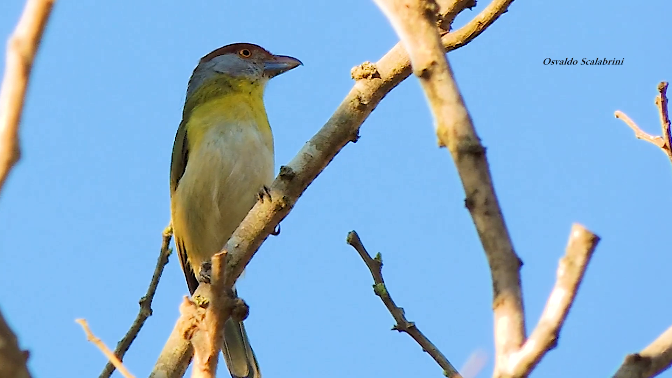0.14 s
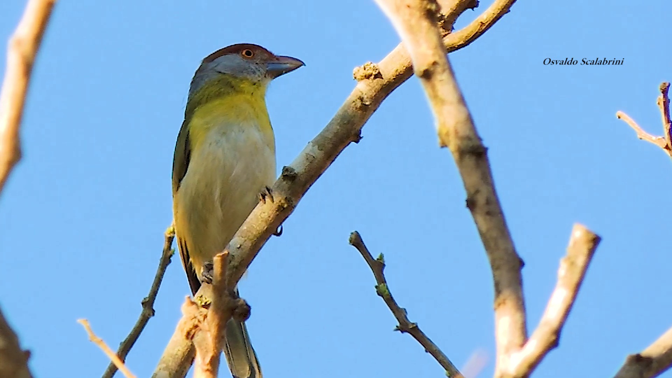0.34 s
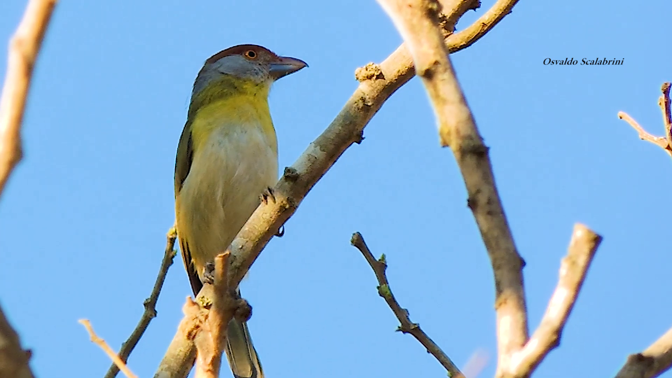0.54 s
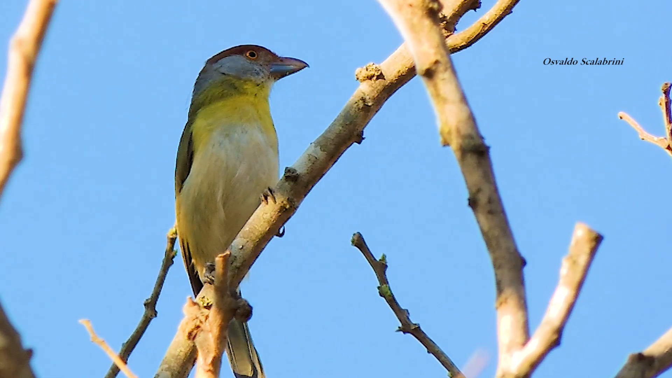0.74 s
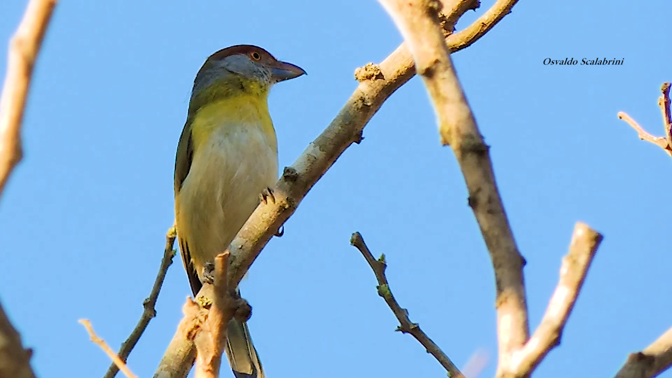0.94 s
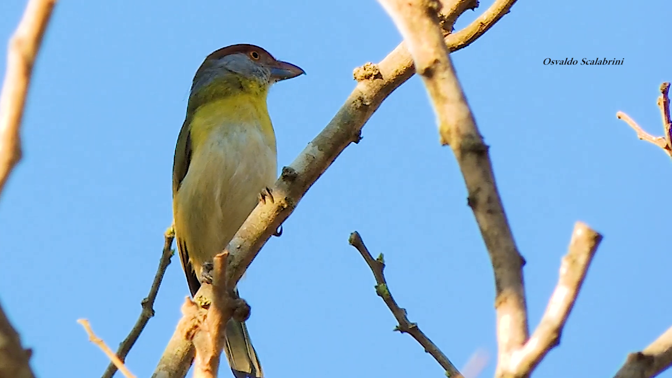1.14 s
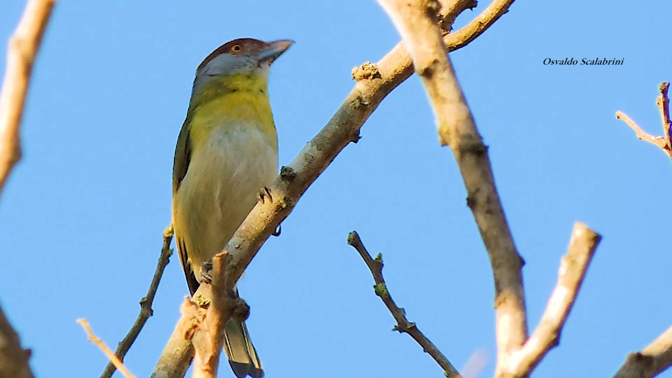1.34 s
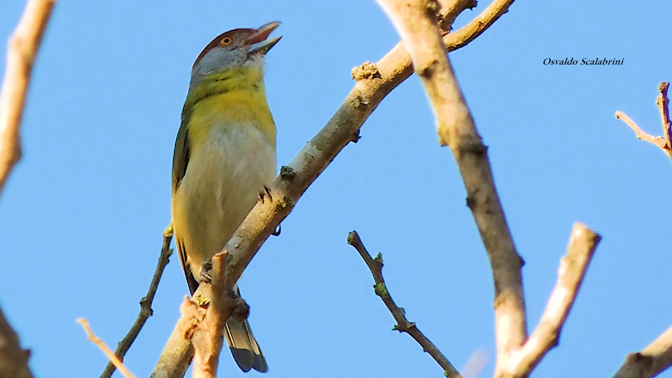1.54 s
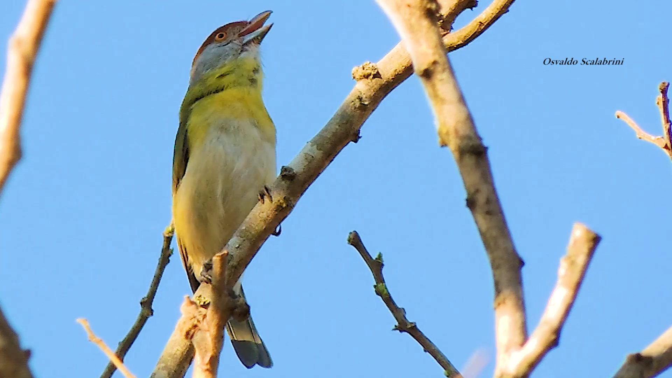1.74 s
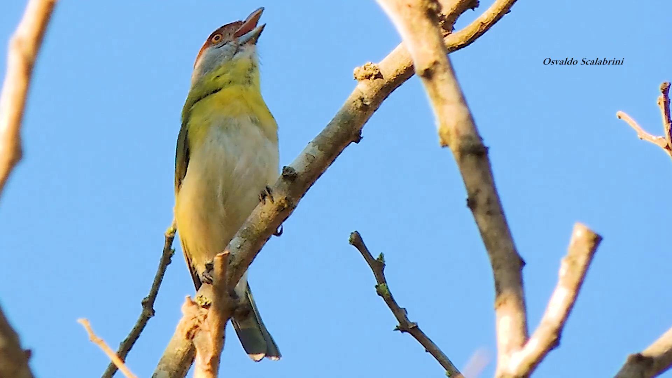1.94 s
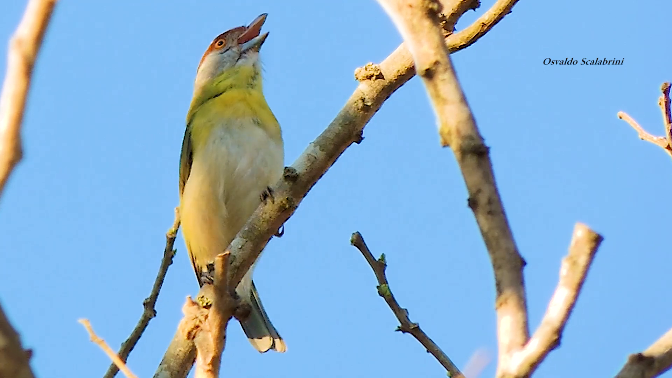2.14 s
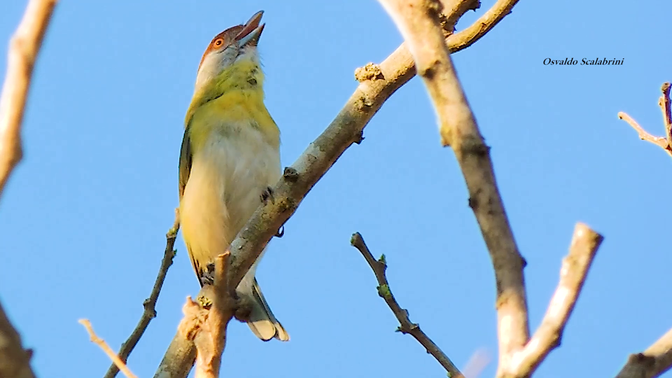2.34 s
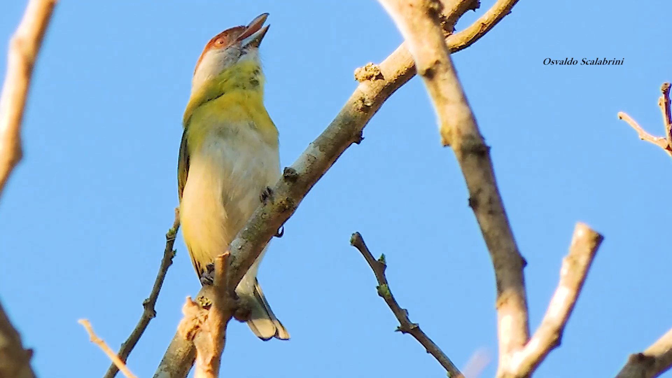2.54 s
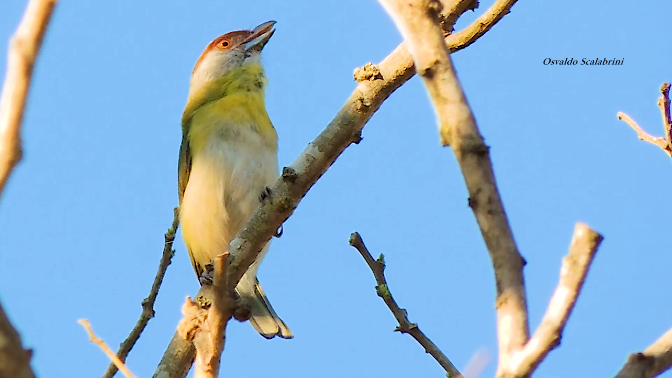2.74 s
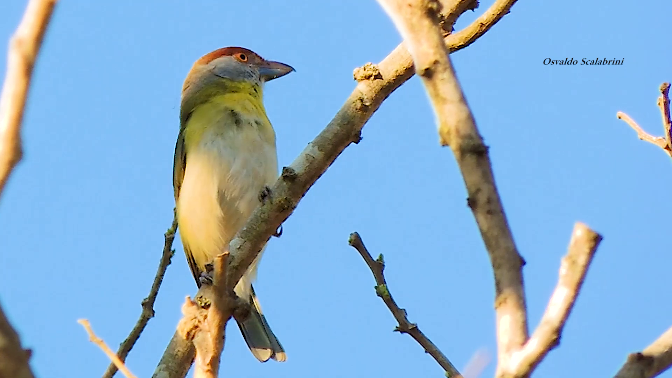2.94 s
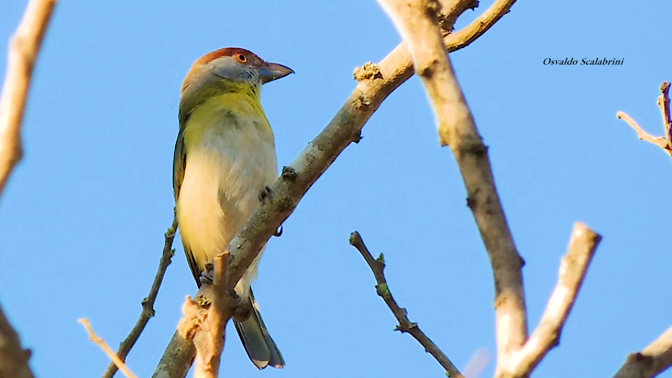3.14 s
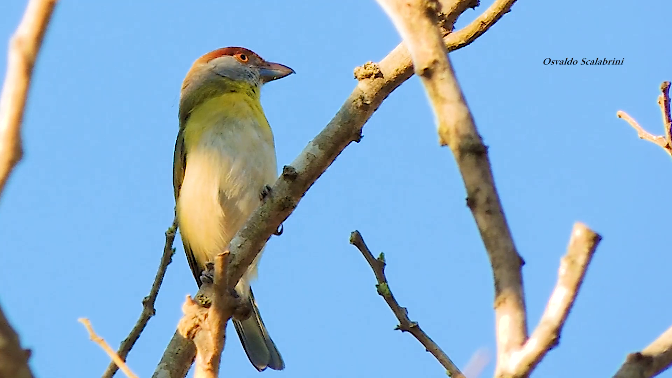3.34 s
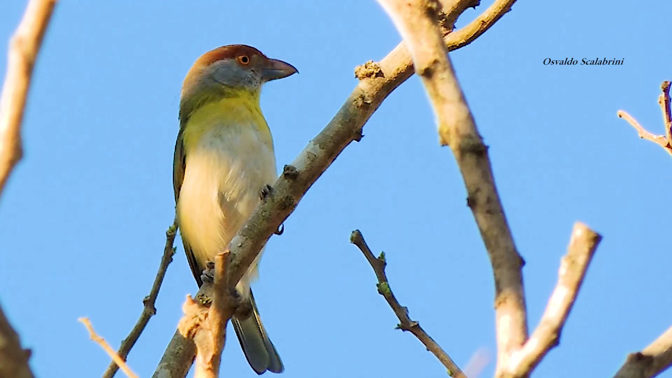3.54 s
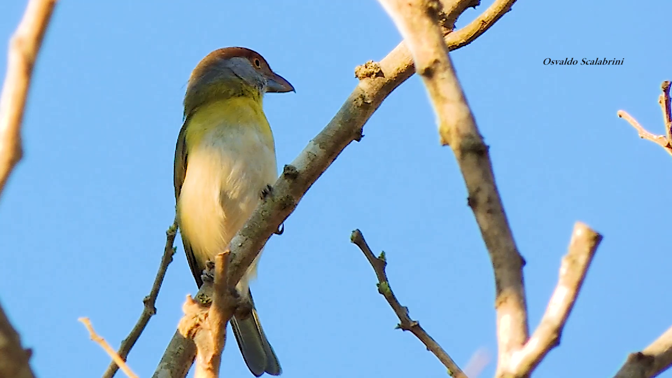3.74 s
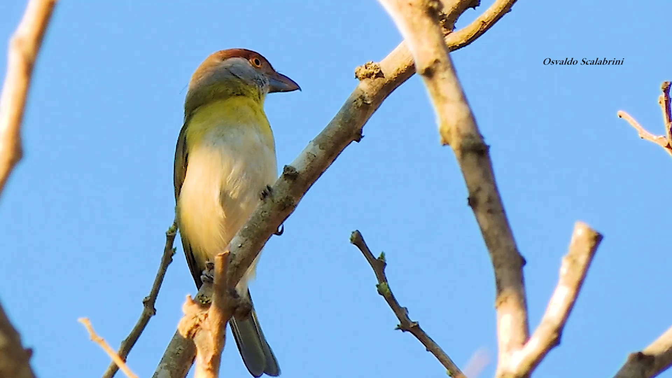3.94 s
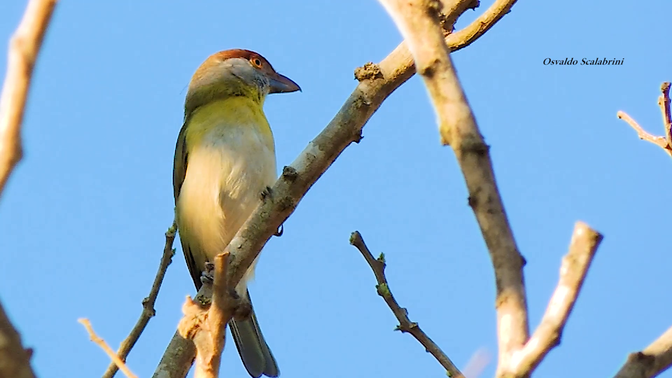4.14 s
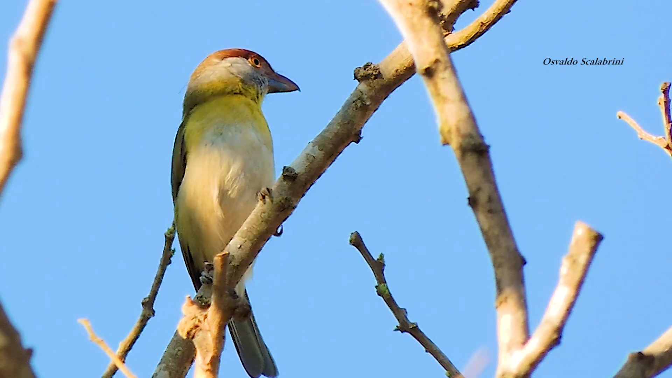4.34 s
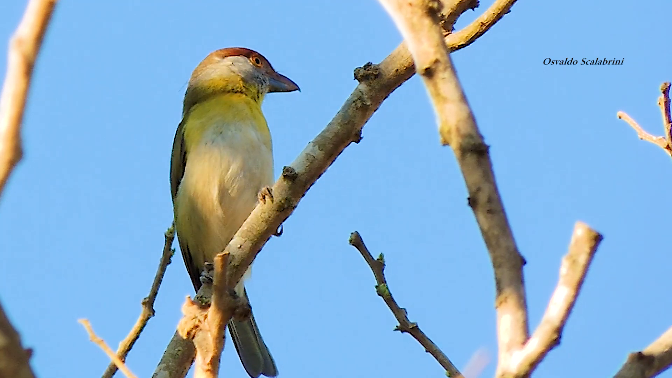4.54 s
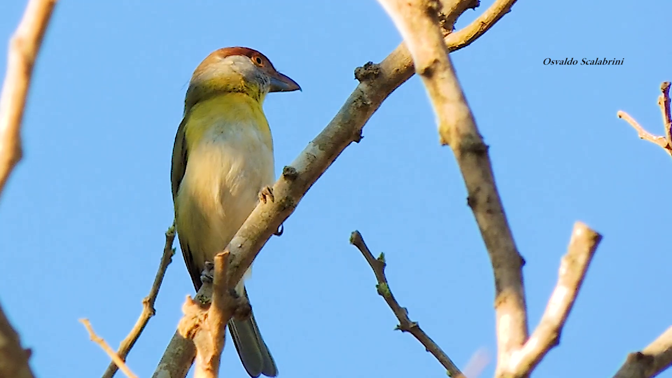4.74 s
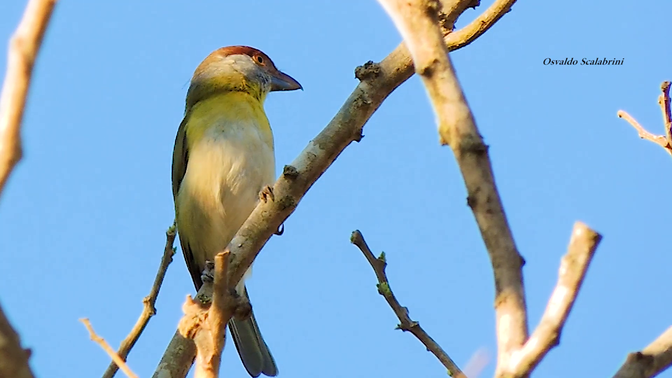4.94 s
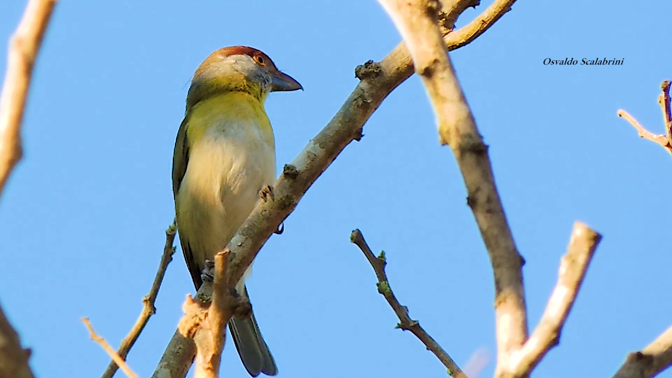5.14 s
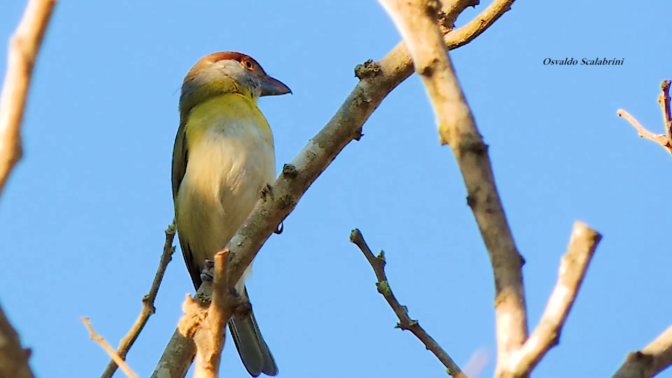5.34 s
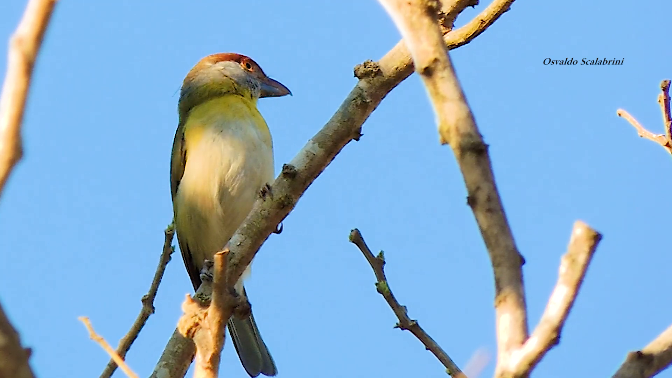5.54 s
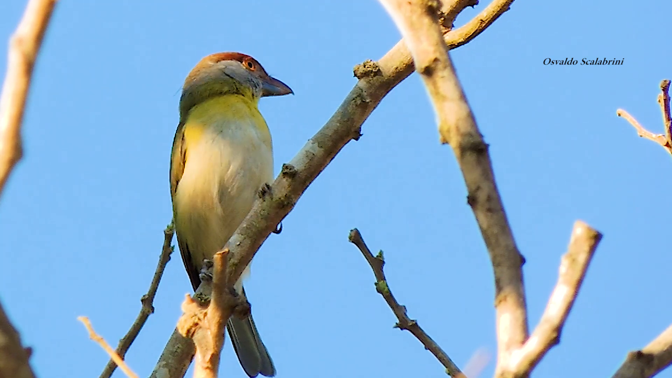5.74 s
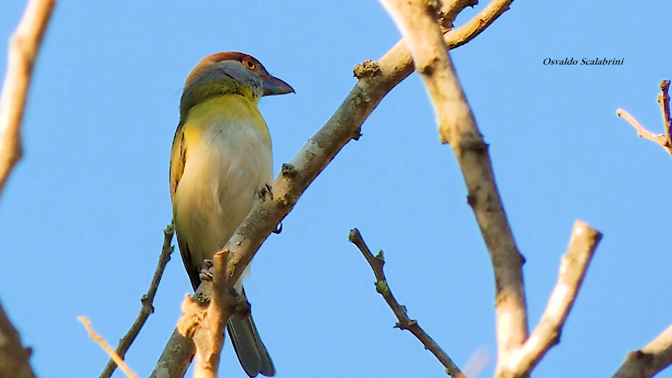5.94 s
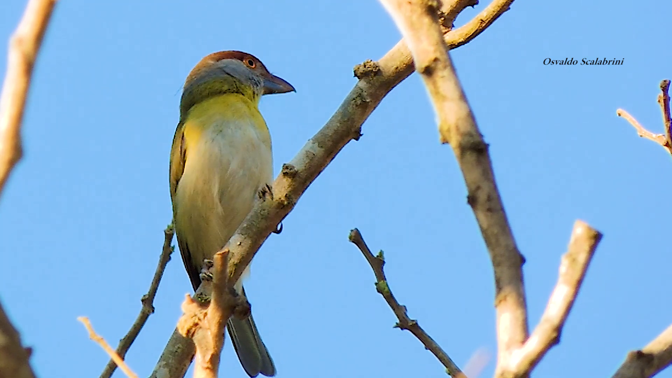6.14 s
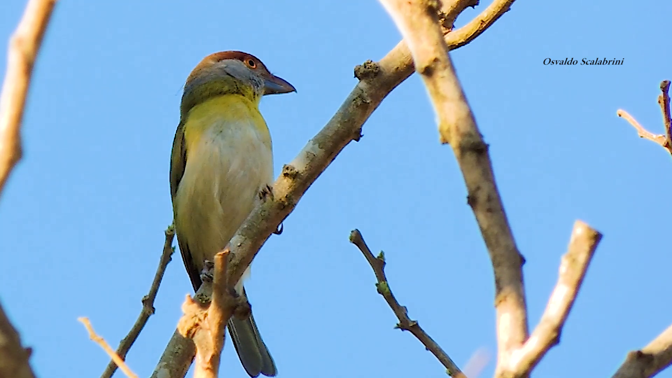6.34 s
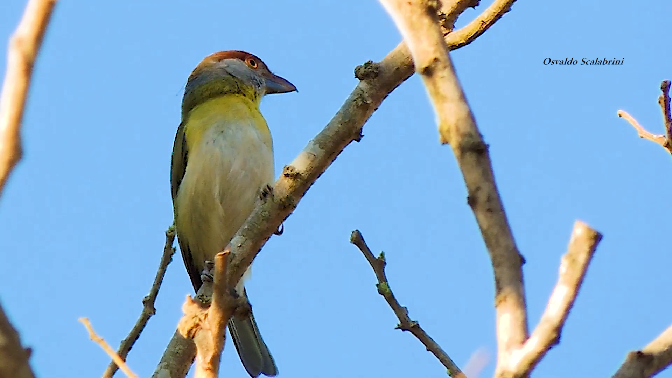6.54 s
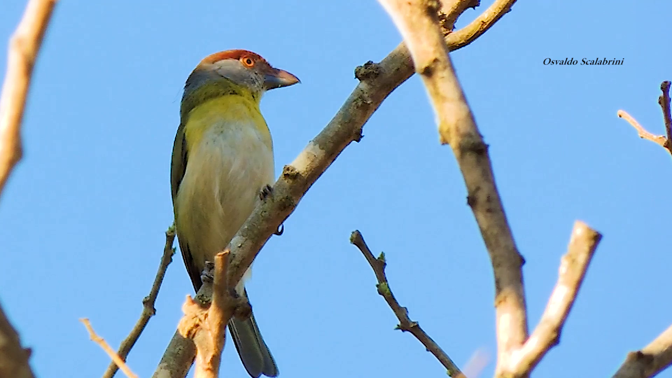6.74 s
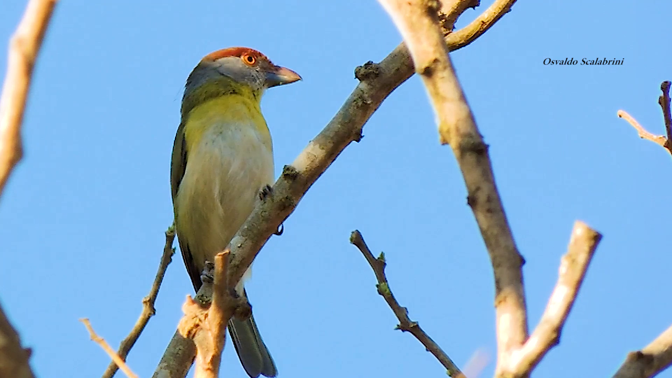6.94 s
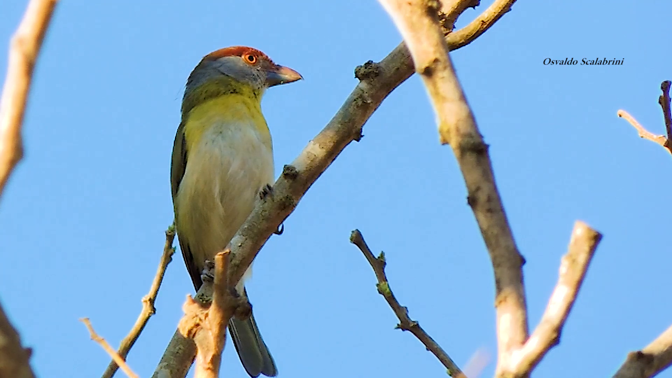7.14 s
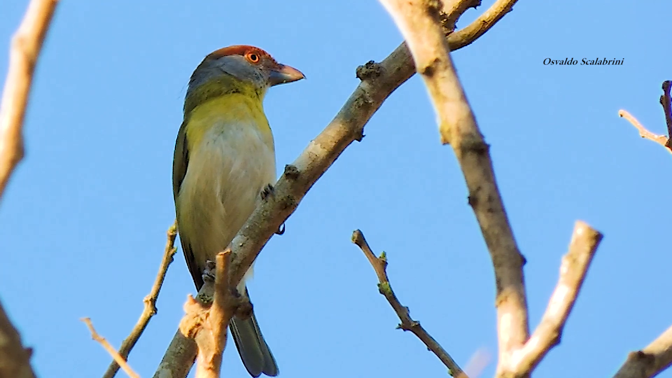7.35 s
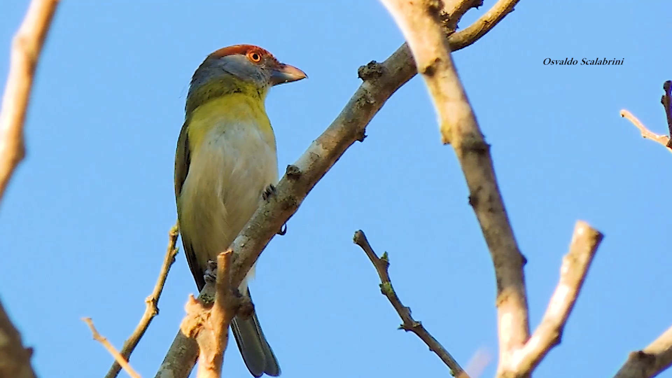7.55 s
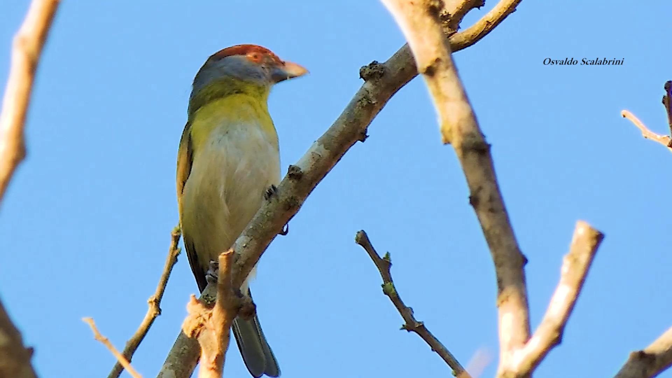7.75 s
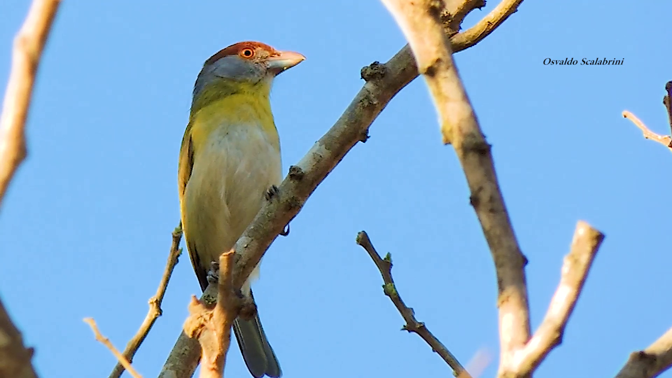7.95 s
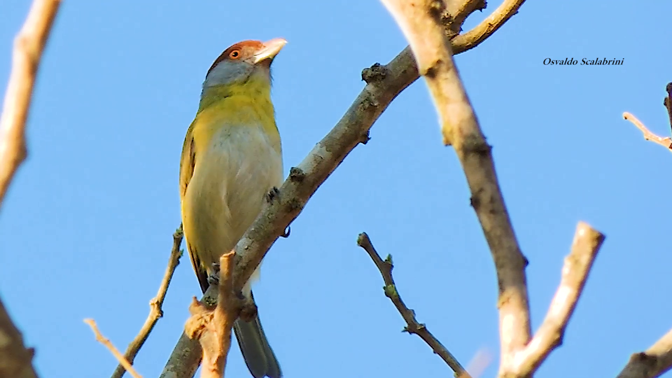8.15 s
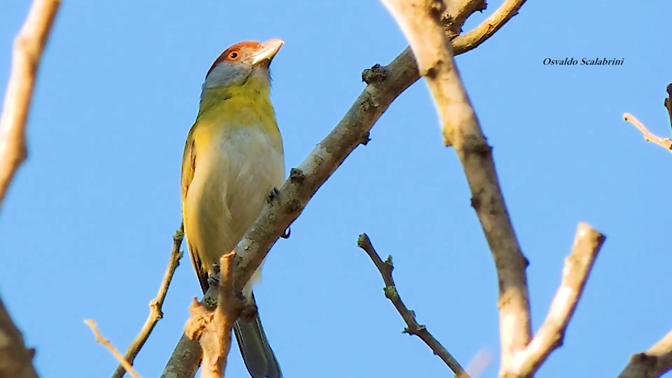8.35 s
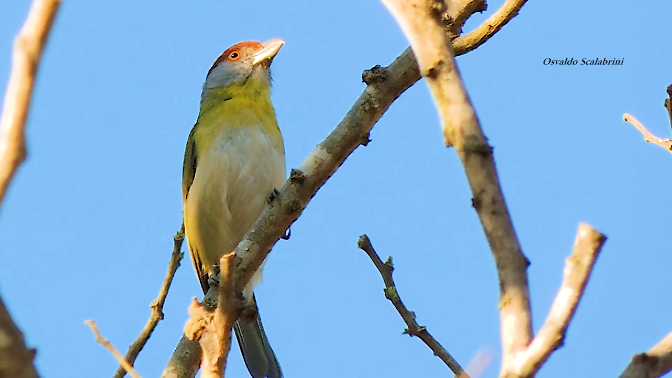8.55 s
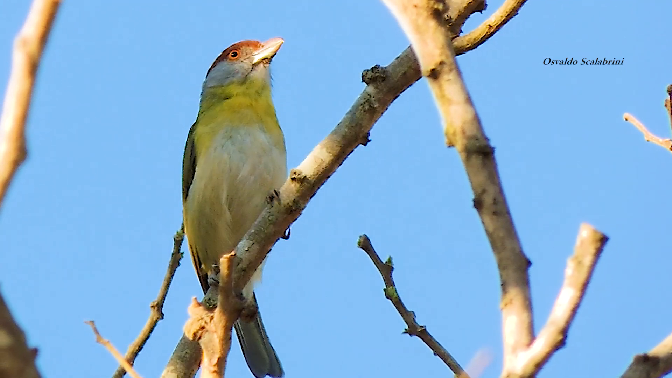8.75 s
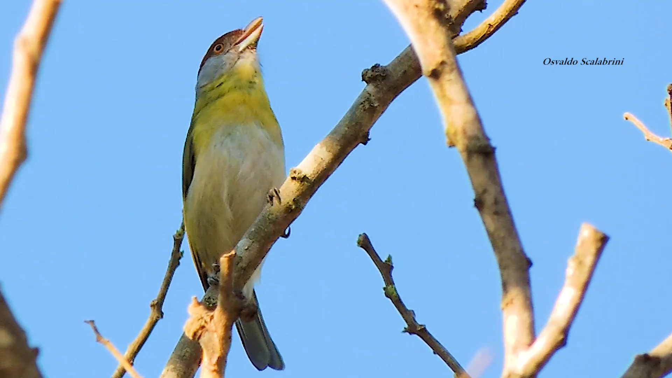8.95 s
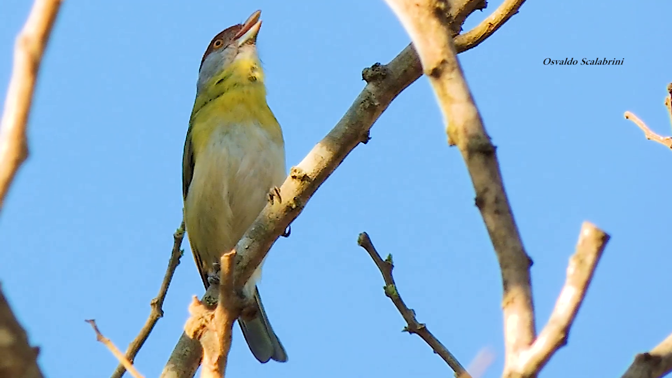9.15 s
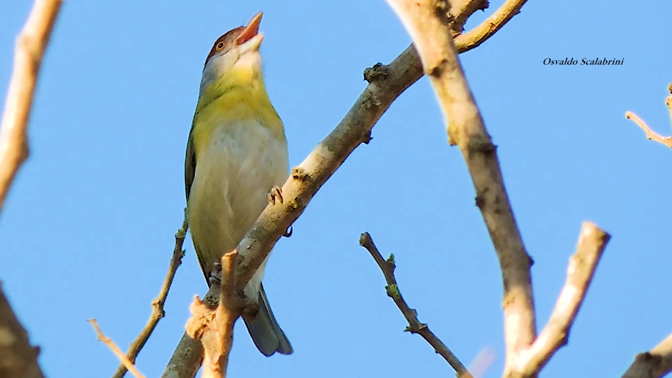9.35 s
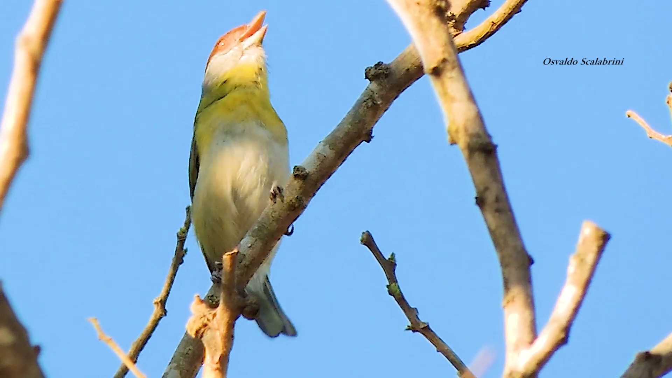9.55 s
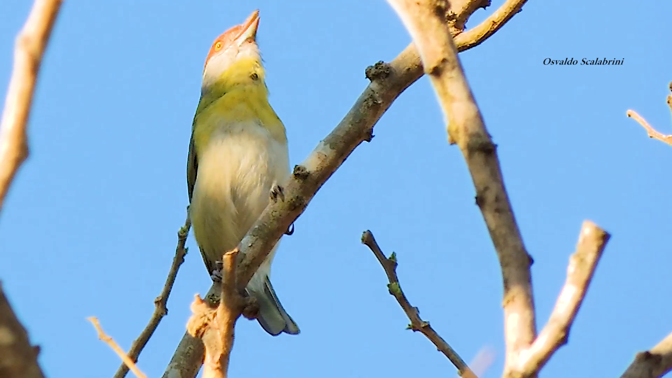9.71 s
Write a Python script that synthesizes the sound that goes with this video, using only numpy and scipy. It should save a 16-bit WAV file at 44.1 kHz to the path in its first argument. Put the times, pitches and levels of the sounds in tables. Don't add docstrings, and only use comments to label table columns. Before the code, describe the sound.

A songbird whistles two loud, clear phrases of quick sliding notes, a long gap between, over a steady high insect drone and cricket trills.

```python
import sys
import numpy as np
from scipy import signal
from scipy.fft import rfft, irfft
from scipy.io import wavfile
from scipy.ndimage import uniform_filter1d

SR = 44100
rng = np.random.default_rng(int(sys.argv[2]) if len(sys.argv) > 2 else 0)


def how_loud(loudness_db):
    steps = np.asarray(loudness_db, float) / 20
    return 10 ** steps


def waveform_to_disk(signal):
    frames = np.transpose(np.atleast_2d(signal))
    scaled = np.clip(frames, -1, 1) * 32767
    samples = np.round(scaled).astype(np.int16)
    wavfile.write(sys.argv[1], SR, samples)


N = 435708
T = np.arange(N) / SR


def level(x, db):
    return x * how_loud(db) / np.sqrt(np.mean(x ** 2))


def across(table, hz):
    row_hz, value = np.transpose(table)
    return np.interp(np.log(hz + 1), np.log(row_hz), value)


def walk(rate):
    k = int(SR / rate)
    steps = np.repeat(rng.standard_normal(N // k + 1), k)
    return 1.3 * uniform_filter1d(uniform_filter1d(steps, k), k)[:N]


def glide(t, s, v):
    slope = np.diff(v) / np.diff(s)
    a, b = np.r_[slope[0], slope], np.r_[slope, slope[-1]]
    tangent = np.where(a * b > 0, 2 * a * b / (a + b + 1e-9), 0)
    k = np.clip(np.searchsorted(s, t) - 1, 0, len(s) - 2)
    h = np.diff(s)[k]
    u = (t - s[k]) / h
    bend = (1 - u) * (tangent[k] - slope[k]) - u * (tangent[k + 1] - slope[k])
    return v[k] + h * u * (slope[k] + (1 - u) * bend)


def pan(db):
    return how_loud(np.array([[db / 2], [-db / 2]]))


def field(spectrum, alike, lag_s):
    hz = np.arange(N // 2 + 1) * SR / N
    shared, left, right = rfft(rng.standard_normal((3, N)))
    share = np.clip(alike(hz), 0, 1)
    delay = np.array([np.exp(-2j * np.pi * hz * lag_s), hz * 0 + 1])
    pair = np.sqrt(share) * shared * delay + np.sqrt(1 - share) * np.array([left, right])
    return irfft(pair * how_loud(across(spectrum, hz)), N)


def scatter(x, direct_db, near_db, near_s, wood_db, wood_s, alike, patchy_db=1.5):
    t = T[:SR]
    shared, left, right = rng.standard_normal((3, SR))
    leaves = np.sqrt(alike) * shared + np.sqrt(1 - alike) * np.array([left, right])
    leaves = leaves * how_loud(patchy_db * walk(70)[:SR])
    near = level(leaves * how_loud(-60 * t / near_s), near_db)
    wood = level(leaves * how_loud(-60 * t / wood_s), wood_db)
    echoes = (near + signal.lfilter([.6], [1, -.4], wood)) / np.sqrt(SR)
    stirring = how_loud(1.8 * np.array([walk(80), walk(80)]))
    echoed = signal.fftconvolve(x * np.ones((2, 1)), echoes, axes=1)[:, :N]
    return how_loud(direct_db) * x + stirring * echoed


# (frequency [Hz], level [dB per Hz])
LEAF_COLOUR = [(35, -86), (60, -56), (167, -61), (396, -38.5), (482, -29.5), (609, -21), (1300, -3),
               (1760, -0.5), (2350, -1.5), (3240, -2.5), (3550, -3.5), (4400, -4.5), (5720, -37),
               (9680, -120)]
# (frequency [Hz], likeness [0-1])
LEAF_ALIKE = [(300, 0.9), (700, 1), (1300, 0.56), (2800, 0.33), (4400, 0.09)]
# (frequency [Hz], level [dB per Hz])
HISS_COLOUR = [(3000, -33), (4500, 2.5), (8000, 2), (11000, 1.5), (14500, -1)]


def air():
    leaves = level(field(LEAF_COLOUR, lambda hz: across(LEAF_ALIKE, hz), lag_s=-.00014), -51.5)
    leaves = leaves * how_loud(.5 * walk(0.4) + .5 * walk(7))
    hiss = level(field(HISS_COLOUR, lambda hz: 0 * hz, lag_s=0), -51.5)
    return leaves * pan(.8) + hiss


def throb(rate_hz, sharp):
    phase = 2 * np.pi * np.cumsum(rate_hz * (1 + 0.0042 * walk(3.0))) / SR
    return np.exp(sharp * (np.cos(phase) - 1))


# (frequency [Hz], level [dB per Hz])
CHORUS_COLOUR = [(2590, -55.5), (4400, -26.5), (4660, -13.5), (4900, -22.5), (5090, -12), (5310, -12.5),
                 (6140, 1), (6500, 4), (7240, -16), (7500, -19.5), (8000, -25), (10400, -46.5),
                 (17600, -120)]
# (time [s], level [dB])
CHORUS_SWELL = [(0.0, -44.5), (2.1, -45), (3.9, -44.5), (5.0, -45), (9.88, -45.5)]


def cicada_chorus():
    drone = field(CHORUS_COLOUR, lambda hz: 0.33 * np.exp(-((hz - 6600) / 400) ** 2), lag_s=.00016)
    drone = level(drone * (1 + 0.83 * throb(56.4, sharp=0.55)), 0)
    swell_db = np.interp(T, *np.transpose(CHORUS_SWELL)) + 0.5 * walk(5)
    return drone * how_loud(swell_db) * pan(2.2)


def cricket(hz, db, rate_hz, sharp, lag_s, pan_db, blur_db):
    stroke = throb(rate_hz, sharp)
    pitch = hz + 35 * walk(90) + 9000 * np.gradient(stroke)
    tone = level(stroke * np.sin(2 * np.pi * np.cumsum(pitch) / SR), 0) * how_loud(db)
    left, right = scatter(tone, direct_db=-0.5, near_db=blur_db, near_s=0.05,
                          wood_db=blur_db, wood_s=0.21, alike=0.033)
    return np.array([np.interp(T - lag_s, T, left), right]) * pan(pan_db)


FALTERS = [
    .23,
    1.765,
    3.523,
    4.62,
    5.446,
    6.421,
    7.276,
    8.9,
    9.669,
]


def high_cricket():
    sag_hz = sum(207.7 * np.exp(-((T - s) / .07) ** 2) for s in FALTERS)
    return cricket(7040 - sag_hz, -59.5 + 1.3 * walk(1.6), rate_hz=61.3, sharp=2.9,
                   lag_s=.00002, pan_db=5.5, blur_db=-0.5)


# (start [s], level [dB])
BOUTS = [
    (-.3, -56),
    (1.02, -56),
    (2.3, -55),
    (3.5, -56),
    (4.78, -56),
    (6.06, -55.5),
    (7.36, -54.5),
    (8.66, -55),
]
BOUT_RISE_S, BOUT_HOLD_S, BOUT_S = .1, .36, .57
BOUT_FADE_DB_PER_S, REST_DB = 30, -76


def bouts():
    db = np.full(N, float(REST_DB))
    when = [0, .02, BOUT_RISE_S, BOUT_HOLD_S, BOUT_S, BOUT_S + 0.033]
    for s, top_db in BOUTS:
        end_db = top_db - BOUT_FADE_DB_PER_S * (BOUT_S - BOUT_HOLD_S)
        bout_db = [REST_DB, top_db - 2.5, top_db, top_db, end_db, REST_DB]
        db = np.maximum(db, np.interp(T - s, when, bout_db))
    return db


def low_cricket():
    bout_db = bouts()
    wing_hz = 4795 + 14 * np.clip(bout_db + 58, -12, 1)
    return cricket(wing_hz, bout_db - 1.5 + 1.2 * walk(30), rate_hz=47.6, sharp=1.6,
                   lag_s=-0.000049, pan_db=3.5, blur_db=-6.5)


def add(out, s, length, first_hz, last_hz, gain, warble):
    at = slice(int(s * SR), int((s + length) * SR))
    u = np.clip((T[at] - s) / length, 0, 1)
    pitch = first_hz + (last_hz - first_hz) * u + warble[at]
    out[:, at] += gain * np.sin(np.pi * u) * np.sin(2 * np.pi * np.cumsum(pitch) / SR)


# (time [s], length [s], first pitch [Hz], last pitch [Hz], level [dB])
FAR_AHEAD = [
    (0.505, 0.026, 4000, 4270, -50),
    (.535, .018, 4300, 5000, -54),
    (0.548, 0.031, 5660, 5700, -46),
    (0.566, 0.018, 5200, 3740, -57),
    (.585, .03, 5500, 4740, -57),
    (3.469, 0.038, 4000, 3910, -52.5),
    (3.635, 0.031, 5900, 5480, -51),
    (3.68, 0.026, 5500, 5100, -57),
    (7.48, .05, 4900, 5100, -56),
    (8.652, 0.033, 3940, 3910, -55),
]
# (time [s], length [s], first pitch [Hz], last pitch [Hz], level [dB])
FAR_LEFT = [
    (5.323, 0.037, 8100, 8730, -54),
    (5.346, 0.039, 8750, 8600, -51),
    (5.41, 0.035, 8500, 8700, -69),
    (7.474, 0.043, 7800, 8540, -49.5),
    (7.506, 0.074, 8160, 8450, -46.5),
]
# (time [s], length [s], middle pitch [Hz], spread [Hz], level [dB])
CHATTER = [(0.529, 0.086, 3990, 1120, -58), (1.85, 0.39, 3730, 150, -54), (3.248, 0.19, 2610, 604, -74.5),
           (3.462, 0.057, 3240, 700, -65), (3.595, 0.13, 4014, 1094, -54), (3.93, 0.1, 4480, 202, -66),
           (4.4, 0.23, 3740, 400, -63), (4.675, 0.2, 3830, 500, -59), (5.079, 0.097, 3850, 332, -58.5),
           (5.61, .07, 3900, 250, -62), (7.498, .08, 9500, 300, -66), (7.769, 0.11, 3950, 250, -60.5),
           (7.966, 0.15, 3970, 302, -59), (8.6, 0.1, 3730, 354, -62)]


def far_birds(chip_s=.012, fall=0.085):
    out, warble = np.zeros((2, N)), 110 * walk(150)
    for whistles, pan_db in ((FAR_AHEAD, 0.5), (FAR_LEFT, 8)):
        for s, length, first_hz, last_hz, db in whistles:
            add(out, s, length, first_hz, last_hz, how_loud(db) * pan(pan_db), warble)
    for s, length, middle_hz, spread_hz, db in CHATTER:
        for when, pitch, size in rng.uniform(-1, 1, (36, 3)):
            hz = middle_hz + 1.2 * spread_hz * pitch
            start = s + length * (when + 1) / 2
            add(out, start, chip_s, hz * (1 + fall), hz * (1 - fall), how_loud(db - 2 + 4.4 * size), warble)
    return scatter(out, direct_db=-4.5, near_db=5.0, near_s=0.19, wood_db=-5.0, wood_s=0.65, alike=0.29)


# (time [s], pitch [Hz], level [dB])
OPENING = [
    [(1.728, 2630, -54), (1.745, 2676, -43.5), (1.757, 2520, -42.5), (1.768, 2120, -35)],
    [(1.783, 2930, -52), (1.795, 3100, -28.5), (1.815, 2887, -30), (1.838, 2820, -24.5), (1.862, 3010, -52)],
    [(1.925, 2890, -40), (1.933, 3120, -34), (1.945, 2650, -32.5), (1.961, 2130, -32)],
]


def opening_notes():
    return [np.transpose(note) for note in OPENING]


# (time [s], pitch [Hz])
HELD = [
    [(1.988, 2010), (2.0, 2497), (2.018, 2550), (2.045, 2376), (2.075, 2265), (2.098, 2364)],
    [(2.247, 2074), (2.261, 2830), (2.275, 3040), (2.305, 2740), (2.33, 2592), (2.381, 2700)],
    [(2.557, 1362), (2.57, 1932), (2.58, 2385), (2.602, 2544), (2.645, 2308), (2.67, 2338), (2.695, 2430)],
    [(2.858, 1686), (2.885, 2240), (2.912, 2582), (2.94, 2320), (2.97, 2088), (3.01, 2038), (3.042, 2200)],
]
# (level [dB], change to the end [dB])
HELD_DB = [
    (-24.5, -4.5),
    (-22.5, -2),
    (-25, 0),
    (-25, -6),
]


def held_notes(lower_hz, overshoot_hz):
    notes = []
    for i, (path, (db, change_db)) in enumerate(zip(HELD, HELD_DB)):
        when, hz = np.transpose(path)
        since = when - when[0]
        if i == 1:
            hz[1] += overshoot_hz
        swell_db = -9.5 * np.exp(-since / 0.0077)
        notes.append((when, hz - lower_hz, db + change_db * since / since[-1] + swell_db))
    return notes


# (time [s], fall ends after [s], top pitch [Hz], dip pitch [Hz], end pitch [Hz])
ZIGZAGS = [
    (2.158, 0.032, 3640, 2520, 1880),
    (2.44, 0.045, 3525, 2130, 1320),
    (2.737, .054, 3246, 2092, 1600),
]
ZIGZAG_DB = [-47, -29, -23.5, -27.5, -24, -25.5, -31]
FLICK_S, BOUNCE_S, SHOULDER_S = .008, 0.0193, .037
FLICK_FROM, HALFWAY, HALF_FALLEN, SHOULDER = .865, .45, .53, .895
BOUNCE_TO_HZ, BOUNCE_SHARE, DROP_HZ_PER_S = 2910, .49, 27000


def zigzag_notes():
    notes = []
    for s, fall, top, dip, end in ZIGZAGS:
        bounce = dip + BOUNCE_SHARE * (BOUNCE_TO_HZ - dip)
        shoulder = SHOULDER * bounce
        drop_s = (shoulder - end) / DROP_HZ_PER_S
        mid_fall_s = FLICK_S + HALFWAY * (fall - FLICK_S)
        when = s + np.array([0, FLICK_S, mid_fall_s, fall, fall + BOUNCE_S,
                             fall + SHOULDER_S, fall + SHOULDER_S + drop_s])
        mid_fall = top - HALF_FALLEN * (top - dip)
        hz = np.array([FLICK_FROM * top, top, mid_fall, dip, bounce, shoulder, end])
        notes.append((when, hz, np.array(ZIGZAG_DB)))
    return notes


# (later by [s], held notes lower by [Hz], louder by [dB], highest swoop over by [Hz])
PHRASES = [
    (0, 0.5, 0, 380.5),
    (7.435, 48, 0, 3),
]


def song():
    sung = []
    for later, lower_hz, louder_db, overshoot_hz in PHRASES:
        phrase = opening_notes() + held_notes(lower_hz, overshoot_hz) + zigzag_notes()
        sung += [(s + later, hz, db + louder_db) for s, hz, db in phrase]
    return [note for note in sung if note[0][0] < T[-1]]


# (frequency [Hz], level [dB])
BEAK = [(3400, -13), (4200, -46), (7500, -50), (9500, -27), (11500, -39), (13200, -25), (14500, -38)]
# (frequency [Hz], level [dB])
THROAT = [(1300, -34), (1850, -17), (2100, -4.5), (2450, 0)]
# (delay [s], level [dB])
PERCH = [
    (.00339, -10),
    (.0066, -18),
    (0.0253, -20.5),
]


def songbird(edge_s=0.0022, effort=0.7, thinning_db=1.5):
    out = np.zeros(N)
    waver = walk(70)
    rasp = 1 + 0.33 * walk(700)
    highpass = signal.butter(4, 8000, "high", fs=SR, output="sos")
    hiss = level(signal.sosfilt(highpass, rasp * walk(SR / 2)), -46)
    flutter = {k: 3.5 * walk(45) - thinning_db * abs(k - 4.3) for k in range(2, 7)}
    for s, hz, db in song():
        at = slice(int(s[0] * SR) + 1, int(s[-1] * SR))
        t = T[at]
        pitch, loud = glide(t, s, hz), glide(t, s, db)
        phase = 2 * np.pi * np.cumsum(pitch) / SR
        whistle = how_loud(waver[at] + across(THROAT, pitch)) * np.sin(phase)
        overtones = sum(how_loud(across(BEAK, k * pitch) + flutter[k][at]) * np.sin(k * phase) for k in flutter)
        tone = whistle + how_loud(effort * (loud + 30.5)) * (overtones * rasp[at] + hiss[at])
        to_edge = np.minimum(t - s[0], s[-1] - t)
        edge = np.sin(np.pi / 2 * np.clip(to_edge / edge_s, 0, 1)) ** 2
        out[at] += np.sqrt(2) * how_loud(loud) * edge * tone
    out = out + sum(how_loud(db) * np.interp(T - lag, T, out) for lag, db in PERCH)
    heard = scatter(out, direct_db=0.56, near_db=-8.5, near_s=0.094, wood_db=-12.0, wood_s=1.0, alike=0.053)
    return heard * pan(-1.2)


def scene():
    insects = cicada_chorus() + high_cricket() + low_cricket()
    return air() + insects + far_birds() + songbird()


def top_cut(x):
    return signal.sosfilt(signal.butter(12, 14250, fs=SR, output="sos"), x)


def record(dry):
    gate = np.interp(T, [0, .002, .003, .012, .0125], [1, .6, .01, .01, 1])
    bass_cut = signal.butter(4, 300, "high", fs=SR, output="sos")
    mix = signal.sosfilt(bass_cut, dry * gate)
    return top_cut(mix)


dry = scene()
out = record(dry)
waveform_to_disk(out)
```